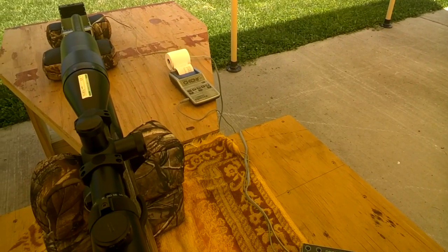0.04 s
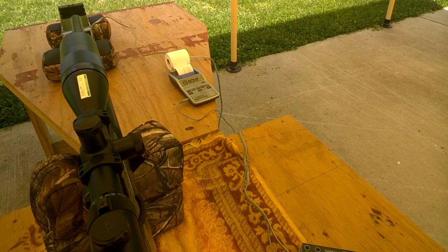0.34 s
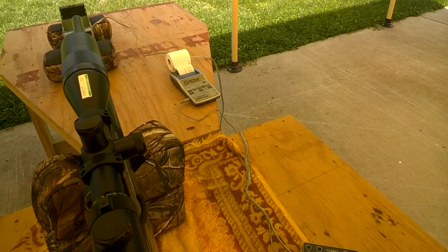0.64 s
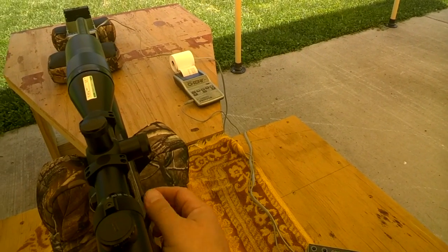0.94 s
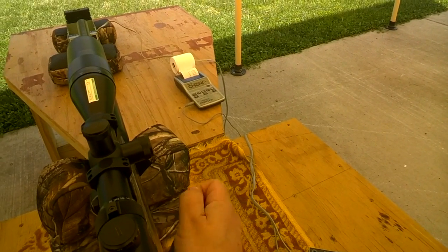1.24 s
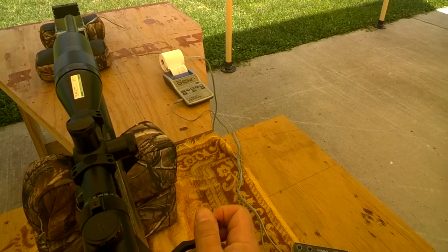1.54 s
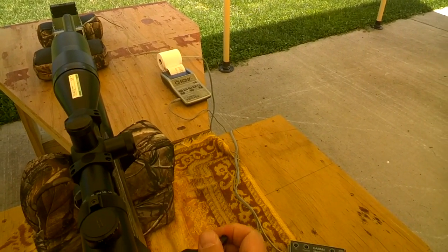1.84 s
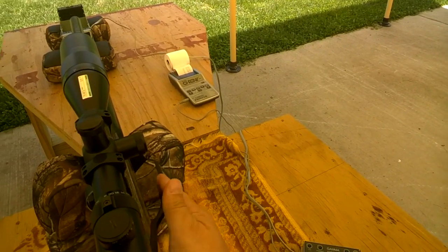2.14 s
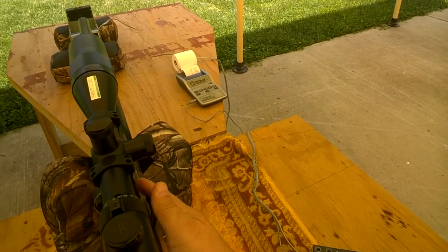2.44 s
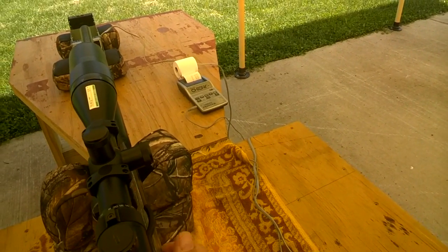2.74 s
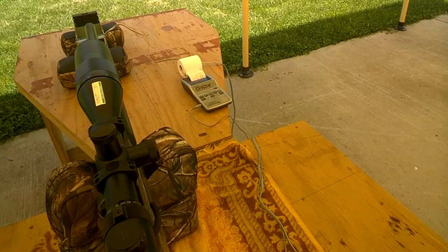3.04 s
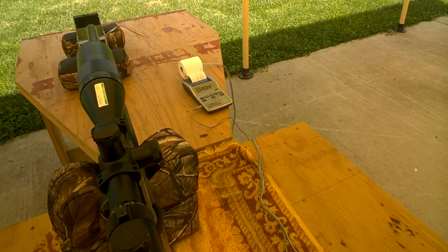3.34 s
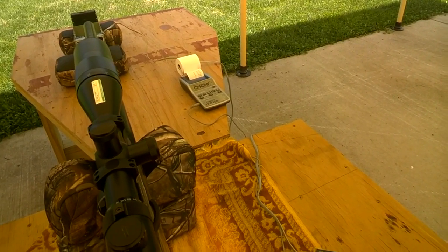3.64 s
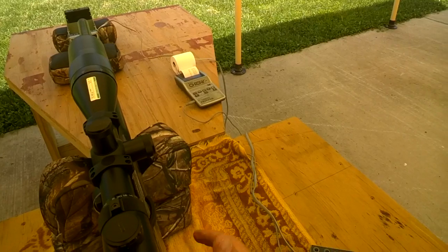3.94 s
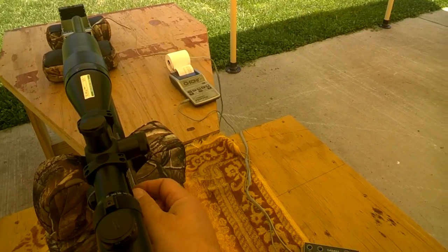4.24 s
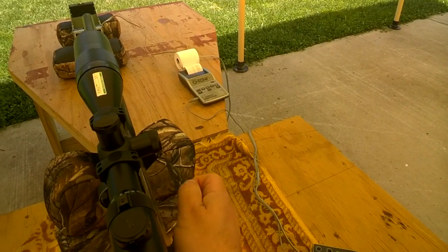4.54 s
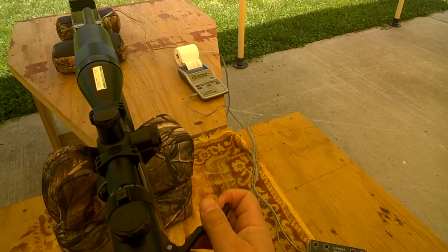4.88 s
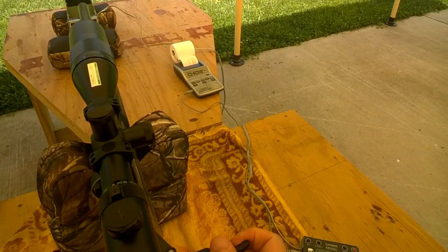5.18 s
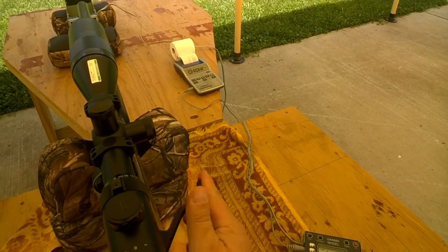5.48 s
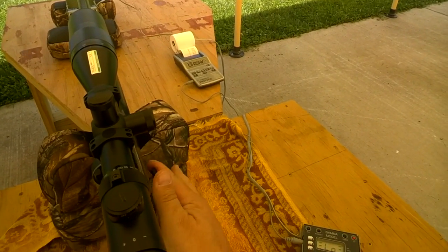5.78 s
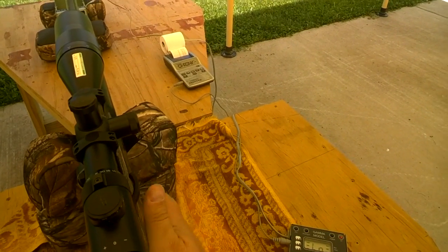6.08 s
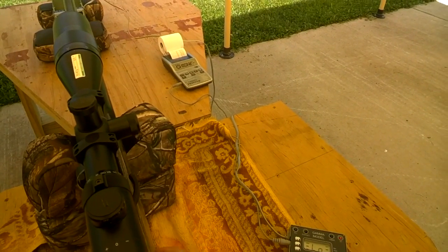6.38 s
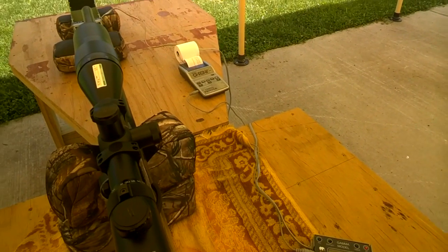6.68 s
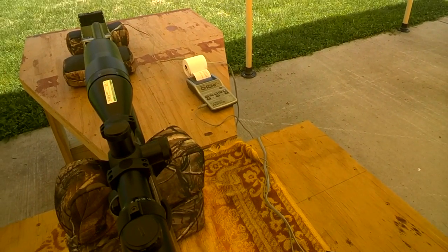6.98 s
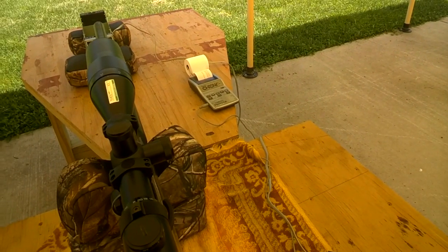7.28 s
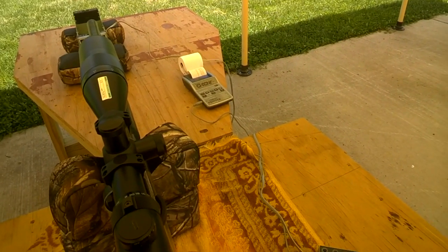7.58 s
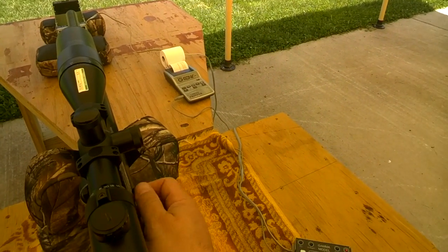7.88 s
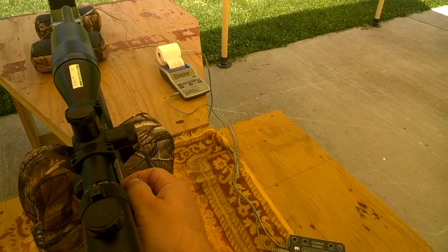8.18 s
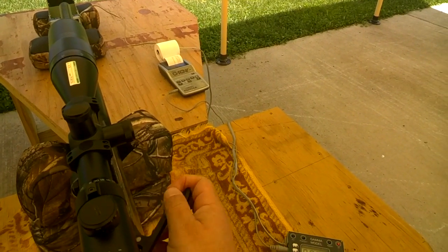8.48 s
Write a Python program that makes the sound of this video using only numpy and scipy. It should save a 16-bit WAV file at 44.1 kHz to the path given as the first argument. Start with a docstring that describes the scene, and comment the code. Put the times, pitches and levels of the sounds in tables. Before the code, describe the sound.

An air rifle fires three sharp cracks outdoors, its steel bolt clacking between shots while a small printer ticks faintly.

```python
"""A hand brushes a rifle stock over low outdoor rumble; then an air rifle cracks, close to the microphone.
It fires three times from a wooden bench under a roof at an outdoor range. Each shot is a hammer crack,
two puffs of air and the hiss of the valve chamber refilling; between shots the steel bolt is worked.
Nearby a chronograph printer ticks in pairs and whines faintly as it feeds its paper.
The roof returns one quick echo, and a low hum swells twice in the distance. One microphone, mono."""
import sys
import numpy as np
from scipy import signal
from scipy.fft import rfft, irfft
from scipy.io import wavfile

SR = 44100
rng = np.random.default_rng(int(sys.argv[2]) if len(sys.argv) > 2 else 0)


def digitize_waveform(pressure):
    """Quantize a signal to 16-bit integers and store it at the path in sys.argv[1].

    Rows of a 2-D input are taken as channels; values are limited to [-1, 1].
    """
    field = np.atleast_2d(pressure).T
    bounded = np.clip(field, -1, 1)
    quanta = np.round(bounded * 32767).astype(np.int16)
    wavfile.write(sys.argv[1], SR, quanta)


N = 375732
TIME = np.arange(N) / SR
AGE = TIME[:16384]   # seconds since the start of one event
CUTOFF_HZ = 14250

# The shots: (time [s], crack [dB], blast [dB], bench kick [dB], refill [s], hiss [dB], whistle [dB])
SHOTS = [(0.425, -18, -20, -39, 0.13, -33, -35), (3.6522, -17, -19.5, -33.5, .133, -33, -44),
         (7.2690, -19.5, -19.5, -34, 0.14, -33, -33)]
# Air leaves the muzzle twice as the hammer bounces on the valve: (delay [s], level re the blast [dB])
VALVE_PUFFS = [(.0044, 0), (.0225, -6.5)]
# Spectra of hammer crack, muzzle blast and refill hiss: (frequency [Hz], level [dB])
CRACK_COLOUR = [(300, -18.5), (1000, -3.5), (2500, -1.5), (5500, 5), (8000, -2.5), (11000, 0),
                (14000, -7.5)]
BLAST_COLOUR = [(40, -13.5), (150, -13.5), (300, -13), (500, -1.5), (700, 0.5), (1050, 7.5), (1500, 0),
                (2800, -5.5), (4500, -9), (8000, -15.5), (14000, -18)]
REFILL_COLOUR = [(400, -24.5), (1000, -14), (2000, -6.5), (3200, -4.5), (5200, -2), (8000, -4),
                 (10500, 0.5), (12500, 2), (14000, -4.5)]
# Decay of the blast: (frequency [Hz], T60 [s])
BLAST_T60 = [(100, .17), (500, 0.06), (1000, 0.1), (2500, 0.076), (6000, 0.096), (14000, .11)]
# Resonances of the blast: (frequency [Hz], width [Hz], boost [dB])
BLAST_PEAKS = [(500, 28, -2), (640, 60, 0), (870, 60, -1.5), (1010, 60, 0), (1130, 210, 2), (1550, 140, 2),
               (2110, 220, 6.5), (2880, 480, 6.5)]
# Stock and bench top, knocked by each puff: (frequency [Hz], relative level [dB], T60 [s])
BENCH_MODES = [(82, -27, 0.05), (146, -23.5, .12), (219.4, -22, 0.037), (362, -19, 0.04), (491.4, -16, .14),
               (599, -15.5, 0.061), (677, -8.5, 0.04), (894, -11, .12), (1000, -9.5, 0.14),
               (1120, -16, 0.18)]
# The regulator opens gradually and shuts fast; shares are of the refill time.
HALF_OPEN_SHARE, OPENING_STEEPNESS, SHUT_SHARE, SHUT_DB_PER_S = .56, 3.6, .95, 580

# Trigger, safety and bolt clacks, with a few stray printer ticks: (time [s], level [dB], part)
# Each "click" row is a stray tick, and so is the "slide" at 4.7033 s.
CLACKS_AND_TICKS = [(.601, -53, "latch"), (1.3289, -41, "trigger"), (1.4286, -30.5, "latch"),
                    (1.4475, -22, "lift"), (1.4775, -24, "stop"), (1.54, -37.5, "tap"),
                    (1.6345, -22.5, "catch"), (1.6605, -17.5, "sear"), (1.7052, -21.5, "magazine"),
                    (1.7365, -41, "stop"), (1.7526, -34.5, "tap"), (1.8675, -24, "catch"),
                    (1.8715, -21.5, "slam"), (1.9359, -39, "tap"), (2.0407, -41, "slide"),
                    (2.127, -43, "click"), (2.4772, -22, "lock"), (2.5058, -49, "latch"),
                    (3.1195, -47, "click"), (3.125, -41, "click"), (3.162, -28.5, "safety"),
                    (3.8485, -49.5, "trigger"), (4.7033, -53, "slide"), (4.8952, -32, "latch"),
                    (4.9123, -21, "lift"), (4.9259, -22, "stop"), (4.9772, -32.5, "tap"),
                    (5.0506, -25.5, "catch"), (5.0565, -18, "sear"), (5.1015, -43, "latch"),
                    (5.1242, -21, "magazine"), (5.1575, -31, "tap"), (5.2942, -25.5, "catch"),
                    (5.2984, -20, "slam"), (5.4072, -41, "tap"), (5.8309, -47, "click"),
                    (5.8476, -22, "lock"), (5.8573, -33.5, "slide"), (6.3385, -46, "click"),
                    (6.345, -35.5, "click"), (6.3808, -28.5, "safety"), (7.4871, -45, "trigger"),
                    (8.3961, -39, "trigger")]
# Each part's voice; bounce and thud are relative to its clack or stray tick:
# part: (contact time [s], bass [dB], treble [dB], resonance [Hz], bounce [dB], thud [dB])
PARTS = {"latch": (.0026, -2, 4.5, 5600, -30, -42), "catch": (.0032, 1.5, 4, 2800, -14, -32),
         "lift": (.0023, 3, -6.5, 2240, -14, -29), "stop": (.0032, 1, -11, 1380, -17, -42),
         "sear": (.0023, -3, -2, 2600, -21, -33), "magazine": (.0027, 3, 5, 5500, -12, -31),
         "slam": (.0042, 8, -8.5, 1050, -21, -28), "lock": (.002, -1, -1.5, 2150, -16, -33),
         "tap": (.0018, 15, 10, 2230, -20, -36), "slide": (.0035, 7, -4.5, 2280, -9, -40),
         "safety": (.0038, 15, 12.5, 5880, -12, -38), "trigger": (.0025, -4, -4, 2750, -22, -38),
         "click": (.0028, 10, 11, 9600, -13, -40)}
BOUNCE_DELAY_RANGE_S, BOUNCE_DULL_DB = (.005, .011), 7
# Steel barrel and action: (frequency [Hz], relative level [dB], T60 [s])
RIFLE_MODES = [(1044, -24.5, 0.14), (1620, 16.5, .06), (1550, -12, .065), (1690, -4.5, 0.027),
               (1960, -40, .056), (2540, -26.5, 0.035), (3230, -37.5, 0.22), (3020, -33.5, 0.099),
               (3870, -29.5, .09), (5000, -25, .12), (5800, -30.5, .12), (6330, -15, .07)]
# The hammer spring is stretched and let go: (time [s], level [dB], swell time [s])
SPRING_BUZZES = [(1.655, -48.5, .022), (1.700, -52.5, 0.019), (1.872, -51.5, .018), (5.052, -44.5, 0.02),
                 (5.300, -51.5, 0.023), (5.858, -57.5, .02)]
# The stock kicks the bench, then settles: (delay [s], level re the kick [dB], contact time [s])
RECOIL = [(.005, 0, .015), (.055, -11, .0048)]
# Spectra of clack, spring and bench knock, and the bags' softening of a thud: (frequency [Hz], level [dB])
CLACK_COLOUR = [(120, -25), (300, -22), (600, -21), (1000, -9), (1600, -5), (2500, 3), (3800, -2.5),
                (5300, 1.5), (6600, -4.5), (8200, -1), (9200, -2.5), (11000, -1), (14000, -6.5)]
SPRING_COLOUR = [(1000, -11.5), (3000, -5.5), (5500, -1), (8000, 1.5), (11000, -2.5), (14000, -3)]
KNOCK_COLOUR = [(40, -7), (120, -7), (220, -4.5), (350, -0.5), (520, 2.5), (750, 0), (1100, -11.5),
                (2500, -36.5), (14000, -61.5)]
THUD_TILT = [(120, 7), (250, 3), (550, -6)]

# A hand slides along the stock: (start [s], stop [s], level [dB])
STROKES = [(0, .3, -84.5), (2.51, 2.6, -64), (2.64, 2.68, -65), (2.76, 2.87, -87), (4.94, 5.0, -66),
           (5.2, 5.24, -71), (7.15, 7.26, -88)]
# Thin squeaks of skin on the stock: (frequency [Hz], width [Hz], boost [dB])
SQUEAKS = [(4900, 400, 6), (6550, 350, 9)]
# The rifle shifts on its bags: (time [s], level [dB], swell time [s])
SCUFFS = [(.092, -71, 0.0082), (1.955, -64, 0.007), (2.04, -64.5, 0.015), (3.095, -75, .008),
          (3.3, -70.5, 0.012), (5.412, -62, 0.014), (5.45, -78, 0.032), (6.51, -76.5, 0.017)]
# Spectra of rubbing skin and scuffing cloth: (frequency [Hz], level [dB])
RUB_COLOUR = [(1500, -13), (3200, -5), (5000, -0.5), (6800, -3), (8000, -13.5), (14000, -15)]
SCUFF_COLOUR = [(200, -18), (1000, 10), (2400, 10.5), (4500, 1.5), (7000, -9), (14000, -24)]

# The paper feed's pawl catches, then lets go: (time [s], catch [dB], release [dB])
FEED_STEPS = [(.615, -62, -56), (.79, -56, -52), (.9445, -62, -43.5), (1.1225, -54, -59),
              (1.1771, -39.5, -55), (1.3691, -47.5, -44), (2.3115, -49.5, -58), (2.6976, -49, -55),
              (2.8748, -47, -35), (4.0178, -54, -55), (4.1589, -50, -47), (4.3247, -52, -48.5),
              (4.5941, -50, -43.5), (4.7284, -50, -40), (5.5066, -45, -51), (5.7245, -47.5, -55),
              (6.032, -45, -44), (7.6285, -55, -50.5), (7.784, -54, -45), (7.958, -51, -41),
              (8.2054, -49.5, -37), (8.3485, -51.5, -38)]
# The pawl's two voices: (contact time [s], bass [dB], treble [dB], resonance [Hz])
PAWL_CATCH, PAWL_RELEASE = (.0017, -10, 0, 9550), (.0023, -1, -3, 9800)
PAWL_TRAVEL_S, SCRAPE_S, SCRAPE_DB = .0277, .007, -66
# The printer motor runs after each shot: (start [s], stop [s], level [dB])
PRINT_RUNS = [(.6, 3.0, -85), (3.85, 6.2, -85), (7.45, 8.6, -82.5)]
# Spectra of pawl, plastic case and gears, and the paper's duller tilt: (frequency [Hz], level [dB])
TICK_COLOUR = [(400, -26), (900, -12.5), (1600, -7.5), (2600, -10.5), (4000, -16.5), (5400, -9),
               (6600, -13), (8200, -6.5), (10000, -8), (11000, -12), (12800, 4), (14000, 0)]
CASE_COLOUR = [(400, -17), (1050, 0.5), (1700, -13), (2800, -10.5), (4500, -19), (14000, -37)]
GEAR_COLOUR = [(500, -5), (1050, 9.5), (1700, -8), (2900, -1.5), (4200, -11), (8000, -24), (14000, -17.5)]
SCRAPE_TILT = [(3000, 0), (13000, -6)]

# Spectrum of the scattered tail under the roof: (frequency [Hz], level [dB])
SHELTER_COLOUR = [(100, -9.5), (500, 9), (1200, 9), (3000, 1), (6000, 1.5), (10000, -8), (14000, -6)]
# Decay of that tail: (frequency [Hz], T60 [s])
SHELTER_T60 = [(100, .14), (1000, .12), (4000, .12), (14000, .1)]
# Spectra of the open air's rumble and far hiss: (frequency [Hz], level [dB])
RUMBLE_COLOUR = [(10, 5), (30, 2.5), (60, -1), (130, -1.5), (200, -10), (270, -10), (340, -5), (400, -9),
                 (480, -16.5), (650, -27.5), (1200, -35.5), (3000, -50.5), (14000, -72)]
FAR_HISS_COLOUR = [(300, 2.5), (1100, 8), (2500, -1), (5000, -6.5), (9000, -6.5), (14000, -5.5)]
# The wind's rumble rises and falls: (time [s], relative level [dB])
WIND = [(0.0, -70), (0.45, -72), (0.83, -77), (1.54, -72), (2.28, -73), (3.2, -71), (3.58, -65),
        (3.92, -76), (6.5, -71), (6.76, -73), (7.97, -76), (8.52, -72)]
# The distant hum swells: (peak time [s], level [dB], rise [s], fall [s])
HUM_SWELLS = [(3.55, -67, .3, .15), (6.45, -77, .25, .15)]


def shots(crack_s, rise_s, hold_s, tail_share):
    """At the bench, the hammer cracks on the valve; each puff builds, holds briefly and dies away."""
    out = np.zeros(N)
    valve_open = tail_share + (1 - tail_share) / (1 + (AGE / hold_s) ** 4)
    attack = 1 - np.exp(-AGE / rise_s)
    for s, crack_db, blast_db, *_ in SHOTS:
        add(out, s, from_db(crack_db) * contact(crack_s, .92, CRACK_COLOUR))
        for delay, db in VALVE_PUFFS:
            blast = dying(noise(len(AGE), BLAST_COLOUR, peaks=BLAST_PEAKS), BLAST_T60) * valve_open
            add(out, s + delay, from_db(blast_db + db) * (blast + ringing(BENCH_MODES)) * attack)
    return out


def refills(whistle_hz, sag_hz, waver_hz, flutter_db):
    """Air hisses through the regulator; a thin whistle sinks as the pressures even out."""
    out = np.zeros(N)
    for s, *_, length, hiss_db, whistle_db in SHOTS:
        progress = AGE / length
        opening = (progress / HALF_OPEN_SHARE) ** OPENING_STEEPNESS
        shut_db = SHUT_DB_PER_S * np.maximum(AGE - SHUT_SHARE * length, 0)
        flow = opening / (1 + opening) * from_db(flutter_db * drift(len(AGE), 740) - shut_db)
        hiss = noise(len(AGE), REFILL_COLOUR)
        thin = signal.sosfilt(signal.butter(1, 5000, "high", fs=SR, output="sos"), hiss)
        closing = np.clip((progress - .8) / .15, 0, 1)
        hiss += closing * (thin - hiss)   # the narrowing gap loses its low notes
        whistle = tone(whistle_hz - sag_hz * np.minimum(progress, .9) + waver_hz * drift(len(AGE), 600))
        add(out, s, flow * (from_db(hiss_db) * hiss + from_db(whistle_db) * flow * whistle))
    return out


def clacks_and_ticks(ring_db):
    """Each rifle clack or stray printer tick bounces once, softer and duller, and rings the same modes."""
    hits = np.zeros(N)
    for s, db, part in CLACKS_AND_TICKS:
        length, bass_db, treble_db, hz, bounce_db, _ = PARTS[part]
        bounce_s = rng.uniform(*BOUNCE_DELAY_RANGE_S)
        for delay, drop_db, dull_db in ((0, 0, 0), (bounce_s, bounce_db, BOUNCE_DULL_DB)):
            voice = (length, bass_db, treble_db - dull_db, hz)
            hit = strike(voice, CLACK_COLOUR, grain_db=4, width_hz=200, peak_db=11)
            add(hits, s + delay, from_db(db + drop_db) * hit)
    return hits + from_db(ring_db) * signal.oaconvolve(hits, ringing(RIFLE_MODES))[:N]


def knocks(thud_s):
    """The wooden bench top thuds dully under each recoil, clack and stray tick."""
    out = np.zeros(N)
    for s, _, _, kick_db, *_ in SHOTS:
        for delay, db, length in RECOIL:
            add(out, s + delay, from_db(kick_db + db) * contact(length, 1, KNOCK_COLOUR))
    for s, db, part in CLACKS_AND_TICKS:
        *_, thud_db = PARTS[part]
        add(out, s, from_db(db + thud_db) * contact(thud_s, 1, KNOCK_COLOUR, THUD_TILT))
    return out


def spring(grain_db):
    """The hammer spring's coils chatter against their guide."""
    out = np.zeros(N)
    for s, db, length in SPRING_BUZZES:
        add(out, s, from_db(db) * contact(length, grain_db, SPRING_COLOUR))
    return out


def handling(grain_db, fade_db_per_s):
    """Close up, skin rubs on the stock, each stroke easing off, and cloth scuffs underneath."""
    pressure = np.zeros(N)
    for start, stop, db in STROKES:
        easing_db = fade_db_per_s * np.maximum(TIME - start, 0)
        pressure += from_db(db - easing_db) * gate(start, stop, ramp_s=.03)
    out = pressure * from_db(grain_db * drift(N, 70)) * noise(N, RUB_COLOUR, peaks=SQUEAKS)
    for s, db, length in SCUFFS:
        add(out, s, from_db(db) * contact(length, grain_db, SCUFF_COLOUR))
    return out


def paper_feed(case_db, case_t60):
    """In the printer the pawl ticks, paper scrapes at each touch and the case rattles on release."""
    ticks, shake = np.zeros(N), np.zeros(N)
    rattle = from_db(-60 * AGE / case_t60) * np.minimum(AGE / SCRAPE_S, 1)
    for s, catch_db, release_db in FEED_STEPS:
        for delay, db, voice in ((0, catch_db, PAWL_CATCH), (PAWL_TRAVEL_S, release_db, PAWL_RELEASE)):
            tick = strike(voice, TICK_COLOUR, grain_db=2.5, width_hz=480, peak_db=7)
            scrape = contact(SCRAPE_S, 4, TICK_COLOUR, SCRAPE_TILT)
            add(ticks, s + delay, from_db(db) * tick)
            add(ticks, s + delay - SCRAPE_S / 2, from_db(SCRAPE_DB) * scrape)
        add(shake, s + PAWL_TRAVEL_S, from_db(release_db + case_db) * rattle)
    return ticks + shake * noise(N, CASE_COLOUR)


def motor(whine_hz, whine_db, sag_hz, waver_hz, unsteady_db, hold_s, recover_s):
    """The printer's geared motor whirrs; its whine sags as the pawl pulls, stays low, then recovers."""
    running = sum(from_db(db) * gate(start, stop, ramp_s=.07) for start, stop, db in PRINT_RUNS)
    pull = np.minimum(AGE / PAWL_TRAVEL_S, 1) * np.exp(-np.maximum(AGE - hold_s, 0) / recover_s)
    load = np.zeros(N)
    for s, *_ in FEED_STEPS:
        add(load, s, pull)
    whine = tone(whine_hz - sag_hz * np.minimum(load, 1) + waver_hz * drift(N, 25))
    return running * (from_db(whine_db + unsteady_db * drift(N, 4.7)) * whine + noise(N, GEAR_COLOUR))


def shelter(direct, echo_s, echo_db, tail_db, build_s):
    """The microphone gets the direct sound, one roof echo and a short tail from bench and slab."""
    scatter = dying(noise(len(AGE), SHELTER_COLOUR), SHELTER_T60)
    response = from_db(tail_db) * scatter * (1 - np.exp(-AGE / build_s))
    delayed = np.interp(TIME - echo_s, TIME, direct)
    echo = signal.sosfilt(signal.butter(1, 6000, fs=SR, output="sos"), delayed)
    return direct + from_db(echo_db) * echo + signal.oaconvolve(direct, response)[:N]


def open_air(rumble_db, hum_hz, hum_db, hiss_db):
    """Beyond the roof: low wind rumble, faint hiss and a distant, wavering hum."""
    wind_db = np.interp(TIME, *np.transpose(WIND))
    rumble = from_db(rumble_db + wind_db) * noise(N, RUMBLE_COLOUR)
    swells = np.zeros(N)
    for s, db, rise, fall in HUM_SWELLS:
        width = np.where(TIME < s, rise, fall)
        swells += from_db(db) * np.exp(-((TIME - s) / width) ** 2)
    hum = (from_db(hum_db) + swells) * from_db(1.5 * drift(N, 4.9)) * tone(hum_hz + 3 * drift(N, 5))
    return rumble + hum + from_db(hiss_db) * noise(N, FAR_HISS_COLOUR)


def strike(voice, colour, grain_db, width_hz, peak_db):
    """One contact of a part, with its own length, brightness and resonance."""
    length, bass_db, treble_db, hz = voice
    tilt = [(900, bass_db), (3300, 0), (10000, treble_db)]
    return contact(length, grain_db, colour, tilt, peaks=[(hz, width_hz, peak_db)])


def contact(swell_s, grain_db, *colours, peaks=()):
    """Surfaces chatter against each other: an uneven burst that swells and stops."""
    progress = AGE[:4096] / swell_s
    swell = progress * np.exp((1 - progress ** 2) / 2)
    burst = noise(len(swell), *colours, peaks=peaks) * swell * from_db(grain_db * drift(len(swell), 1400))
    return rms_one(burst) * np.sqrt(np.mean(swell ** 2))


def ringing(modes):
    """Struck modes dying away, neighbours in opposite sign."""
    return sum((-1) ** k * from_db(db - 60 * AGE / t60) * np.sin(2 * np.pi * hz * AGE)
               for k, (hz, db, t60) in enumerate(modes))


def dying(x, t60s):
    """Each octave of x dies away at its own rate."""
    hz, spectrum = np.fft.rfftfreq(len(x), 1 / SR), rfft(x)
    centres = np.geomspace(100, 12800, 8)
    shares = [at_hz(list(zip(centres, row)), hz) for row in np.eye(len(centres))]
    return sum(irfft(spectrum * share, len(x)) * from_db(-60 * AGE / at_hz(t60s, centre))
               for centre, share in zip(centres, shares))


def noise(size, *colours, peaks=()):
    """Noise of rms 1 with the given spectra and resonances."""
    hz = np.fft.rfftfreq(size, 1 / SR)
    db = sum(at_hz(colour, hz) for colour in colours)
    db += sum(boost / (1 + (2 * (hz - centre) / width) ** 2) for centre, width, boost in peaks)
    phases = np.exp(2j * np.pi * rng.random(len(hz)))
    return rms_one(irfft(from_db(db) * (hz < CUTOFF_HZ) * phases, size))


def tone(hz):
    """A sine of rms 1 that follows a pitch curve."""
    return np.sqrt(2) * np.sin(2 * np.pi * np.cumsum(hz) / SR)


def drift(size, rate_hz):
    """A random wander of spread about 1."""
    return np.interp(np.arange(size) * rate_hz / SR, np.arange(4096), rng.standard_normal(4096))


def gate(start, stop, ramp_s):
    """Rise from start, hold until stop, then fall."""
    return np.clip(np.minimum(TIME - start, stop + ramp_s - TIME) / ramp_s, 0, 1)


def at_hz(points, hz):
    """Read a curve on a log-frequency axis."""
    frequencies, values = np.transpose(points)
    return np.interp(np.log(hz + 1), np.log(frequencies), values)


def add(track, s, sound):
    """Mix a sound in at time s."""
    i = round(s * SR)
    track[i:i + len(sound)] += sound[:N - i]


def from_db(db):
    """Decibels to gain."""
    return 10 ** (np.asarray(db) / 20)


def rms_one(x):
    """Scale to rms 1."""
    return x / np.sqrt(np.mean(x ** 2) + 1e-20)


def scene():
    """Rifle and printer near the microphone under the roof, the open air behind."""
    bench = clacks_and_ticks(ring_db=-58) + spring(grain_db=3.5) + knocks(thud_s=.004)
    bench += handling(grain_db=3, fade_db_per_s=28)
    bench += shots(crack_s=.0025, rise_s=.00068, hold_s=.022, tail_share=.1)
    bench += refills(whistle_hz=13830, sag_hz=330, waver_hz=60, flutter_db=.8)
    printer = paper_feed(case_db=-28, case_t60=.18)
    printer += motor(whine_hz=2925, whine_db=-8, sag_hz=165, waver_hz=16, unsteady_db=2.5,
                     hold_s=.085, recover_s=.06)
    bench = shelter(bench, echo_s=.0095, echo_db=-18, tail_db=-45, build_s=.002)
    printer = shelter(printer, echo_s=.008, echo_db=-20, tail_db=-52, build_s=.002)
    return (bench + printer + open_air(rumble_db=1.8, hum_hz=167, hum_db=-86, hiss_db=-88))[None]


def record(dry):
    """After the microphone, peaks are rounded, the top is cut and the converter sits slightly off zero."""
    ceiling, offset = .3, -.0012
    rounded = ceiling * np.tanh(dry / ceiling)
    return signal.sosfilt(signal.ellip(10, .3, 70, CUTOFF_HZ, fs=SR, output="sos"), rounded) + offset


dry = scene()
out = record(dry)
digitize_waveform(out)
```